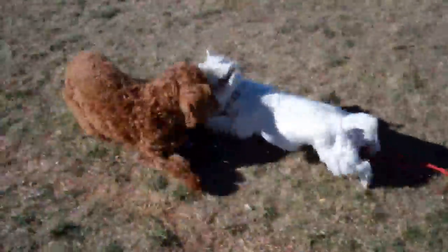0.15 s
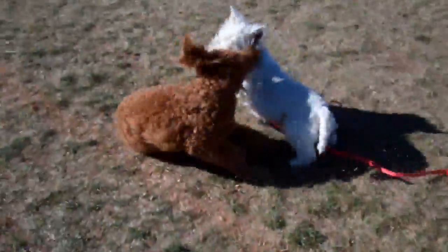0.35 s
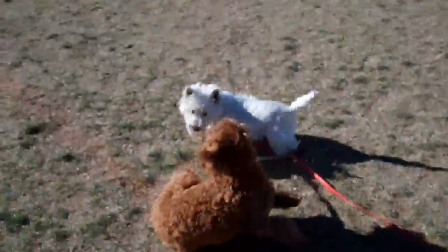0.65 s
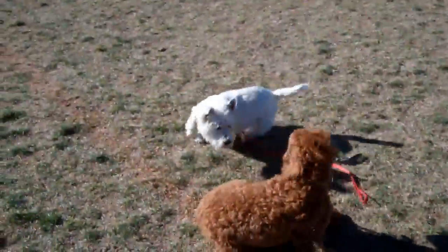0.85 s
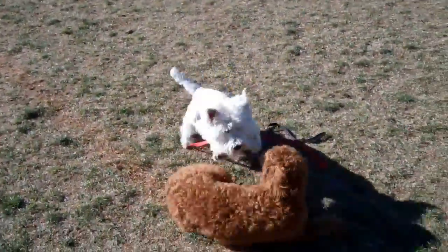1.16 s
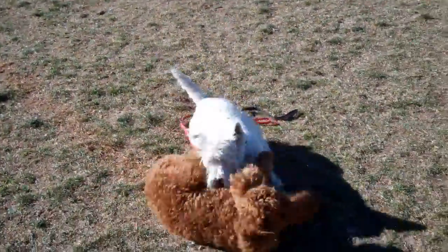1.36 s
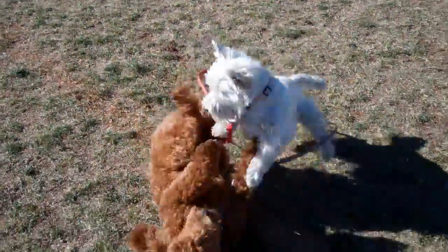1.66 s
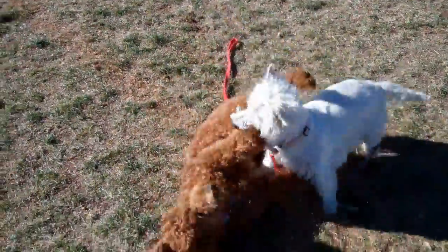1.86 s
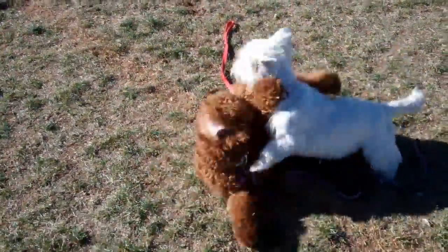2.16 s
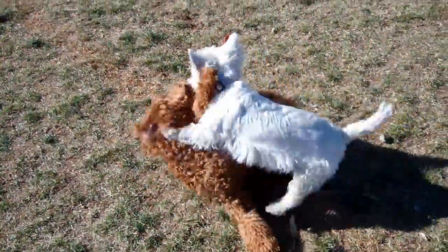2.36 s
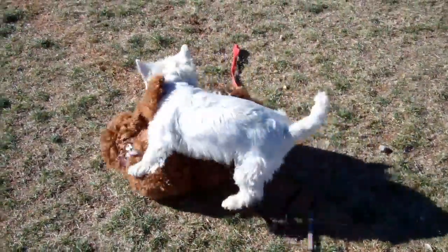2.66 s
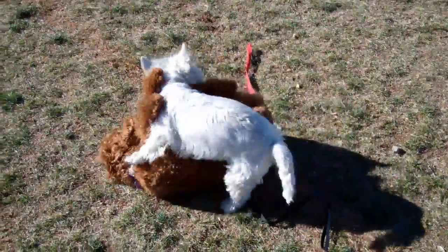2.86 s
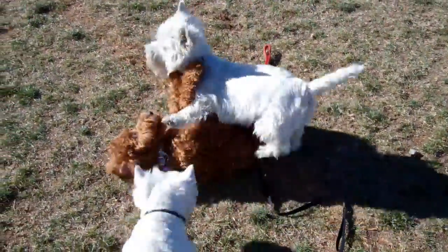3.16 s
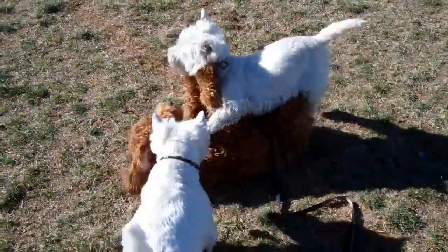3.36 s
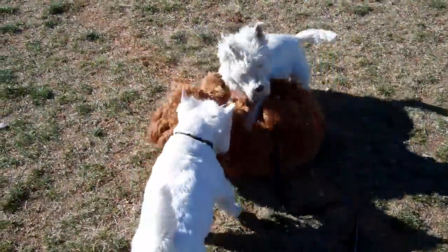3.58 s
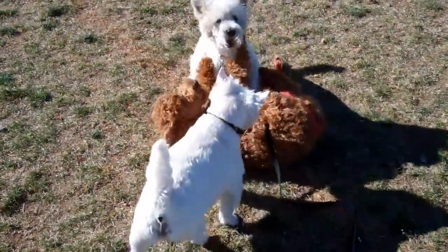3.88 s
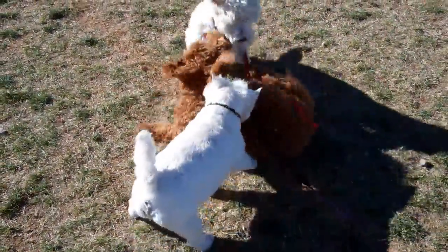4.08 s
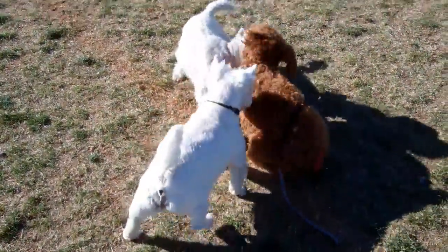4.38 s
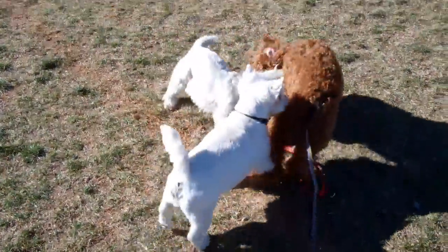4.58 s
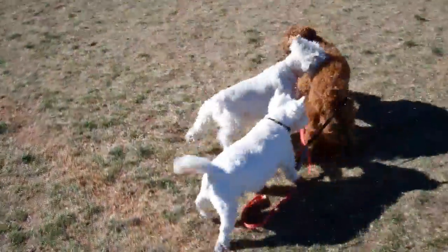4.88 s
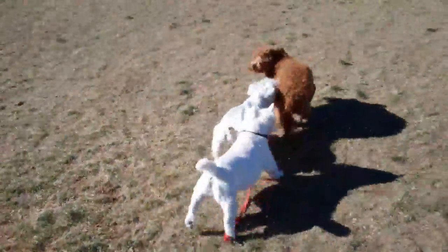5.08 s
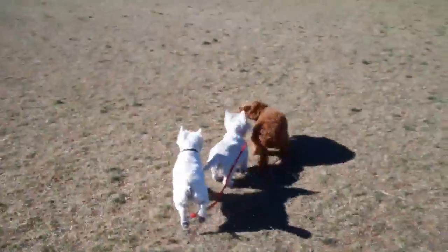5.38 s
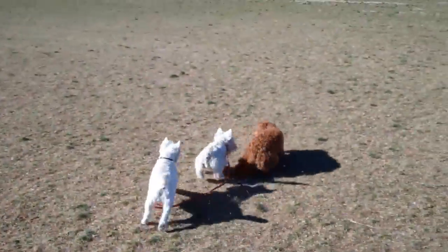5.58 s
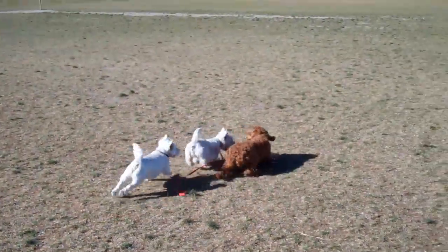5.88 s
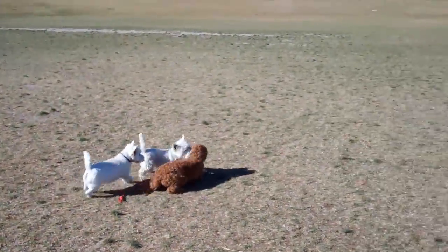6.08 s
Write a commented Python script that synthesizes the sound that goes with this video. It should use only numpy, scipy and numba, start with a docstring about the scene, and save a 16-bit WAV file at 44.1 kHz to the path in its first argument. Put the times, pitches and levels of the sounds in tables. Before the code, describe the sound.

Small dogs play-fight on dry grass in an open park. Wind buffets a stereo microphone, mostly on the right, as they snort and their tags tick and clink. A thin whine leads to a long rough growl, a louder one and a softer one, then short grunts. Grass crackles and collars jingle faintly throughout, with snorts returning to the end.

```python
"""Small dogs wrestle on dry grass in an open park, with wind on a two-port microphone.
First wind and a thump on the left, nose snorts (resonated air), modal tag clinks, ticks (ringing noise).
Then a whine, a long and a loud growl, a softer one and short grunts: fold pulses through moving resonances.
Large-tag clinks cross the growls; snorts return up to the end.
Throughout: crackling grass (random snaps), faint jingling, a gusty breeze mostly on the right, park hush."""
import sys
import numpy as np
from scipy import signal
from scipy.fft import rfft, irfft
from scipy.io import wavfile
from scipy.ndimage import uniform_filter1d
from numba import njit

SR = 44100
rng = np.random.default_rng(int(sys.argv[2]) if len(sys.argv) > 2 else 0)


def store_pcm(level_fs):
    """Save levels as 16-bit WAV."""
    pcm = np.round(np.clip(level_fs, -1, 1) * 32767).astype(np.int16)
    wavfile.write(sys.argv[1], SR, np.atleast_2d(pcm).T)


N = 275184
TIME = np.arange(N) / SR
CUTOFF_HZ = 15600


def from_db(db):
    """Decibels to gain."""
    return 10 ** (np.asarray(db) / 20)


def rms_one(x):
    """Scale to unit power."""
    return x / np.sqrt(np.mean(x ** 2) + 1e-20)


def in_time(rows):
    """Each column of a curve at every sample."""
    s, *columns = np.transpose(rows)
    return [np.interp(TIME, s, column) for column in columns]


def at_hz(points, hz):
    """Read a spectrum on a log-frequency axis."""
    f, value = np.transpose(points)
    return np.interp(np.log(hz), np.log(f), value)


def drift(rate_hz):
    """Smooth chance with spread 1, changing about rate_hz times a second."""
    step = 20  # computed at every 20th sample, then interpolated
    r = np.exp(-2 * np.pi * step * rate_hz / SR)
    noise = rng.standard_normal(N // step + 2002)
    slow = signal.lfilter([1], [1, -2 * r, r * r], noise)[2000:]  # drop the filter's onset
    return np.interp(np.arange(N) / step, np.arange(len(slow)), rms_one(slow))


def coloured(x, spectrum):
    """Causal (minimum-phase) filter with the given spectrum; white noise keeps its power."""
    size = 8192
    hz = np.arange(size // 2 + 1) * SR / size + 1
    gain = rms_one(from_db(at_hz(spectrum, hz)))
    fold = np.r_[1, np.full(size // 2 - 1, 2), np.zeros(size // 2)]
    cepstrum = irfft(np.log(gain)) * fold
    impulse = irfft(np.exp(rfft(cepstrum)))
    return signal.fftconvolve(np.atleast_2d(x), impulse[None], axes=1)[:, :N]


def butter(x, order, hz, kind="low"):
    """Butterworth filter."""
    return signal.sosfilt(signal.butter(order, hz, kind, fs=SR, output="sos"), x)


def resonance(x, hz, width_hz):
    """Two-pole band-pass with gain 1 on top."""
    r = np.exp(-np.pi * width_hz / SR)
    zeros = np.array([1, 0, -1]) * (1 - r * r) / 2
    return signal.lfilter(zeros, [1, -2 * r * np.cos(2 * np.pi * hz / SR), r * r], x)


@njit
def moving_resonance(x, angle, r):
    """The same band-pass with centre (radians a sample) and pole radius given at each sample."""
    y = np.zeros(len(x))
    for i in range(2, len(x)):
        drive = (1 - r[i] ** 2) / 2 * (x[i] - x[i - 2])
        y[i] = drive + 2 * r[i] * np.cos(angle[i]) * y[i - 1] - r[i] ** 2 * y[i - 2]
    return y


def panned(x, left_db):
    """Level difference between the two ports."""
    return x * from_db(np.array([[left_db], [-left_db]]) / 2)


def add(out, s, sound):
    """Mix a short stereo sound in at time s."""
    start = int(np.clip(s * SR, 0, N - 1))
    out[:, start:start + sound.shape[-1]] += sound[..., :N - start]


# tilt of the side noise: hz, likeness (1 = least side)
LIKENESS = [(3000, 1), (12000, 0.3)]


def stereo_noise(spectrum):
    """Noise nearly alike at both ports; a faint side part, weighted to the treble, sets them apart."""
    side_spectrum = []
    for hz, db in spectrum:
        unlike = np.clip(1 - at_hz(LIKENESS, hz), .01, 1) / 2
        side_spectrum.append((hz, db + 10 * np.log10(unlike)))
    mid = coloured(rng.standard_normal(N), spectrum)
    side = coloured(rng.standard_normal(N), side_spectrum)
    return rms_one(mid + from_db(-25) * side * [[1], [-1]])


def swelling(base, swells, rise_s, fall_s):
    """Level in dB of a slow base with swells on top; each rises, holds and falls."""
    power = from_db(in_time(base)[0]) ** 2
    for start_s, length_s, db in swells:
        outside = np.maximum((start_s - TIME) / rise_s, (TIME - start_s - length_s) / fall_s)
        power = power + (from_db(db) * np.exp(-np.clip(outside, 0, 10) ** 2)) ** 2
    return 10 * np.log10(power)


# upper resonances of the muzzle: centre_hz, width_hz, relative_db
MUZZLE = [(2167, 190, 1), (2600, 81, -0.5), (3700, 250, -8), (5300, 270, -15)]
THROAT_HZ, THROAT_WIDTH_HZ, MOUTH_WIDTH_HZ = 770, 170, 170
VOICE_FADE_S = 0.0081


def voice(curve, throat_db, bite_db=0, rasp=0.74, snarl_db=-3, snarl_ratio=1.312, throb_db=2.5, throb_hz=70):
    """Vocal folds swing evenly when clear and lurch when rough; their pulses ring throat and moving mouth."""
    start_s, end_s = curve[0][0], curve[-1][0]
    near = (TIME > start_s - .05) & (TIME < end_s + .05)
    t = TIME[near]
    level_db, pitch_hz, rough, mouth_hz, treble_db = [c[near] for c in in_time(curve)]
    rough = np.clip(rough, 0, 1)

    even_cycles = np.cumsum(pitch_hz * (1 + .024 * drift(110)[near])) / SR
    harmonics = range(1, int(SR / 2 / pitch_hz.max()))
    clear = rms_one(sum(np.cos(2 * np.pi * k * even_cycles) for k in harmonics))
    uneven_cycles = np.cumsum(pitch_hz * (1 + .16 * drift(130)[near])) / SR
    pulses = np.diff(np.floor(uneven_cycles), prepend=0)
    pulses = rms_one(pulses * from_db(5 * drift(170)[near]))
    air = rng.standard_normal(len(t)) * (1 + np.cos(2 * np.pi * uneven_cycles))
    lurching = rms_one(pulses + rasp * air)
    source = np.cos(np.pi / 2 * rough) * clear + np.sin(np.pi / 2 * rough) * lurching

    mouth_angle = 2 * np.pi * mouth_hz * (1 + .08 * rough * drift(35)[near]) / SR
    mouth_r = np.full(len(t), np.exp(-np.pi * MOUTH_WIDTH_HZ / SR))
    mouth = moving_resonance(source, mouth_angle, mouth_r)
    # a rough snarl bares the teeth and adds a resonance above the mouth's
    snarl = rough * moving_resonance(source, snarl_ratio * mouth_angle, mouth_r)
    throat = resonance(source, THROAT_HZ, THROAT_WIDTH_HZ)
    low = mouth - from_db(snarl_db) * snarl - from_db(throat_db) * throat
    low = butter(low, 2, [min(1.55 * pitch_hz.mean(), 600), 1900], "band")

    high = 0
    breathy = source + air * rough * rasp
    for (hz, width_hz, db), bared in zip(MUZZLE, [0, 0, 1, 1]):  # bite_db sets the upper two
        # lips and tongue tremble: each resonance wanders and flickers on its own
        angle = 2 * np.pi * hz * (1 + .055 * drift(22)[near]) / SR
        flicker = from_db(db + bared * bite_db + 3 * drift(35)[near])
        high = high + flicker * moving_resonance(breathy, angle, np.full(len(t), np.exp(-np.pi * width_hz / SR)))
    high = butter(high, 2, [1500, 7000], "band")

    # even out both bands over 16 ms, so that the curve sets the level
    low, high = [band / np.sqrt(uniform_filter1d(band * band, size=700) + 1e-12) for band in (low, high)]
    outside_s = np.maximum(np.maximum(start_s - t, t - end_s), 0)
    fade = np.exp(-(outside_s / VOICE_FADE_S) ** 2)
    throb = throb_db * rough * drift(throb_hz)[near]
    out = np.zeros(N)
    out[near] = (low + from_db(treble_db) * high) * fade * from_db(level_db + throb)
    return out


# thin wavering whine: time_s, level_db, pitch_hz
WHINE = [(1.585, -61, 599), (1.612, -50.5, 548), (1.641, -60, 600), (1.66, -58, 575), (1.685, -49, 618),
         (1.704, -45.5, 583), (1.745, -55, 552)]


def whine(rough=0.48, treble_db=-10):
    """A thin voice with the mouth tuned to its second harmonic."""
    curve = [(s, db, hz, rough, 2 * hz, treble_db) for s, db, hz in WHINE]
    return voice(curve, throat_db=-12)


# short grunts: peak_s, rise_s, level_db, pitch_hz, roughness (0-1), mouth_hz
GRUNTS = [(4.319, 0.012, -45.5, 410, 0.54, 1240), (4.729, 0.026, -47, 215, 0.8, 1180),
          (4.913, 0.035, -50, 258, 0.4, 980), (5.053, 0.062, -46, 262, 0.54, 1130)]


def grunts(edge_db=-11, release_share=0.65, glide_per_s=3.2, treble_db=-13):
    """Each grunt swells and dies a little faster, while pitch and mouth glide upward together."""
    out = 0
    for s, rise_s, db, hz, rough, mouth_hz in GRUNTS:
        curve = []
        for t, drop_db in [(-rise_s, edge_db), (0, 0), (release_share * rise_s, edge_db)]:
            glide = 1 + glide_per_s * t
            curve.append((s + t, db + drop_db, hz * glide, rough, mouth_hz * glide, treble_db))
        out = out + voice(curve, throat_db=-5.0)
    return out


# growls, all with columns time_s, level_db, pitch_hz, roughness (0-1), mouth_hz, treble_db
# a long growl that clears into short hoots
LONG_GROWL = [(2.493, -45.5, 356.2, 0.65, 1090, -14.5), (2.515, -32, 339.5, 0, 1070, -26),
              (2.536, -44, 334.3, 0.8, 1060, -4), (2.548, -34, 392, 0.54, 1140, -22),
              (2.59, -38.5, 408, 0.68, 1090, -10.5), (2.63, -37, 396, 0.82, 1110, -14),
              (2.672, -39, 371, 0.45, 1150, -13.5), (2.727, -47.5, 361, 0.9, 1120, -12),
              (2.755, -36.5, 360, 0.1, 1100, -19), (2.778, -49, 363.3, 0.8, 930, -5.5),
              (2.85, -40.5, 364, 0.72, 1080, -13), (2.877, -50, 380, 0.65, 1065, -1),
              (2.902, -36.5, 364, 0.3, 1090, -28), (2.918, -46, 372, 0.6, 1120, -19)]
# the loud growl, the mouth opening, closing and opening again
LOUD_GROWL = [(3.197, -46, 351.6, 1, 1340, -15), (3.213, -40, 352.7, 0.3, 1230, -8),
              (3.219, -29.5, 364.7, 0.34, 1170, -17), (3.256, -32, 413, 0.74, 1300, -19),
              (3.278, -34, 418.4, 0.7, 1300, -6.5), (3.305, -34.5, 410.4, 0.5, 1120, -12.5),
              (3.324, -40.5, 405, 0.95, 1010, -7), (3.344, -31, 418, 0.66, 920, -19),
              (3.369, -40, 430, 0.77, 870, -6), (3.384, -25.5, 427, 0.1, 890, -21),
              (3.404, -41.5, 414.6, 0.97, 1040, -4.5), (3.428, -32, 427, 0.3, 1160, -11.5),
              (3.455, -43, 387.4, 0.87, 1180, -2), (3.48, -38, 356.6, 0.08, 1150, -18.5),
              (3.502, -47.5, 325.7, 0.4, 980, -6)]
# a softer, clearer growl that swells late
SOFT_GROWL = [(3.725, -58.5, 331, 0.7, 1330, -9), (3.78, -49, 393.4, 0.2, 1190, -9.5),
              (3.825, -50, 333, 0.24, 1280, -12), (3.847, -60, 363, 0.8, 1110, -6),
              (3.872, -40.5, 368.6, 0.07, 1110, -8.5), (3.9, -47.5, 339.6, 0.5, 990, -12),
              (3.938, -37.5, 345.5, 0.28, 1210, -5), (3.968, -41.5, 385, 0.54, 1220, -23),
              (4.008, -52, 381.6, 0.35, 1160, -9)]


def growls():
    """All calls of the dogs, each with its own weight of throat and its own bite."""
    long = voice(LONG_GROWL, throat_db=1.0, bite_db=-5.0)
    loud = voice(LOUD_GROWL, throat_db=1.5, bite_db=-1.0)
    soft = voice(SOFT_GROWL, throat_db=-3.0, bite_db=-2.0)
    return whine() + long + loud + soft + grunts()


# snorts and huffs: peak_s, rise_s, fall_s, level_db, nose_hz
SNORTS = [(0.067, 0.022, 0.019, -47.5, 1620), (.468, 0.017, 0.0097, -47.5, 2250),
          (0.495, 0.012, 0.015, -46, 2340), (0.543, 0.025, 0.014, -40, 1720),
          (0.799, 0.02, 0.039, -49, 2630), (1.372, 0.011, 0.011, -49.5, 980),
          (1.426, 0.027, 0.017, -40.5, 1100), (1.507, 0.029, 0.053, -48, 1800),
          (1.885, 0.059, 0.031, -50.5, 2000), (2.005, 0.022, 0.022, -51.5, 3070),
          (2.925, 0.015, 0.0096, -48, 3000), (4.345, 0.033, 0.046, -52, 1460),
          (4.8, 0.023, 0.046, -53, 1840), (5.163, 0.038, 0.015, -42, 1740),
          (5.641, 0.051, 0.098, -56, 1900), (5.931, 0.036, 0.024, -39.5, 2070)]
# spectrum of their air: hz, relative_db (per Hz)
SNORT_AIR = [(300, 12.5), (750, 16), (1300, 10.5), (2300, 8), (3800, 7.5), (5500, 1.5), (10000, -7),
             (13000, -56)]


def snorts(nose_width_hz=560, nose_db=14.0, upper_db=6, upper_ratio=1.69, flutter_db=1.5):
    """Short blasts of air through two nose resonances, chopped by uneven flaps of the soft palate."""
    flaps = np.cumsum(140 * (1 + .35 * drift(60))) / SR  # about 140 a second
    chop = .22 + np.exp(-3.5 * (flaps % 1))
    air = stereo_noise(SNORT_AIR) * chop * from_db(flutter_db * drift(49))
    out = np.zeros((2, N))
    for s, rise_s, fall_s, db, hz in SNORTS:
        near = (TIME > s - 3 * rise_s) & (TIME < s + 3 * fall_s)
        t, flow = TIME[near] - s, air[:, near]
        nose = from_db(nose_db) * resonance(flow, hz, nose_width_hz)
        upper = from_db(upper_db) * resonance(flow, hz * upper_ratio, nose_width_hz)
        swell = np.exp(-(t / np.where(t < 0, rise_s, fall_s)) ** 2)
        out[:, near] += from_db(db) * rms_one(flow + nose + upper) * swell
    return out


# rustle of grass, fur and collars: time_s, relative_db
SCUFFLE = [(0.0, -58), (.534, -65.5), (.76, -73), (1.12, -66), (2.98, -64.5), (3.27, -59), (3.6, -65),
           (4.33, -63), (5.235, -52), (5.28, -69.5), (6.238, -70.5)]
# quick lunges through the grass: start_s, length_s, relative_db
LUNGES = [(1.403, 0.12, -59.5), (3.541, 0.12, -58.5), (5.794, 0.16, -60)]


def movement_db():
    """How hard the dogs stir the grass."""
    return swelling(SCUFFLE, LUNGES, rise_s=0.011, fall_s=0.013)


# faint jingling: its strength, half its range, and the power of the movement that its rate follows
JINGLE_DB, JINGLE_SPREAD_DB, JINGLE_FOLLOWS = -65, 5, 0.9


def blows(clinks, answer, count):
    """The clear clinks and some faint ones at random: s, then dB in each mode group, by the place struck."""
    chance = np.cumsum(from_db(JINGLE_FOLLOWS * movement_db()))
    faint = []
    for when, force, place in rng.random((count, 3)):
        s = np.interp(when, chance / chance[-1], TIME)
        faint.append((s, JINGLE_DB + JINGLE_SPREAD_DB * (2 * force - 1), place))
    face_db, rim_db = np.transpose(answer)
    return [(s, *(db + face_db + np.clip(place, 0, 1) * (rim_db - face_db)))
            for s, db, place in list(clinks) + faint]


def tag(clinks, modes, groups, detune, rattle_hz, left_db, spread_db, contact_s=0.00029):
    """A metal disc is struck and bounces once; rattling on its ring shifts and blurs its modes."""
    out, t = np.zeros((2, N)), TIME[:SR // 4]
    for s, *strengths_db in clinks:
        bounce_s = rng.uniform(.004, .02)
        for (hz, db, t60_s), group in zip(modes, groups):
            shift, lean, lag = rng.standard_normal(3)
            blur = np.cumsum(rng.standard_normal(len(t))) * np.sqrt(2 * np.pi * abs(rattle_hz) / SR)
            phase = 2 * np.pi * hz * (1 + detune * shift) * t + uniform_filter1d(blur, size=30)
            phase = phase + np.array([[1], [-1]]) * 0.42 * lag  # radians, opposite at the ports
            decay = from_db(strengths_db[group] + db - 60 * t / t60_s)
            envelope = decay * (1 - np.exp(-t / contact_s))
            ring = panned(np.sin(phase) * envelope, left_db + spread_db * lean)
            add(out, s, ring)
            add(out, s + bounce_s, ring * from_db(-14))
    return out


# clear clinks: time_s, strength_db (relative), place struck (0 face - 1 rim)
SMALL_CLINKS = [(0.3202, -49.5, 0.23), (0.586, -49, 0.44), (1.1338, -52.5, 0.72), (1.505, -42, 0.48),
                (2.0827, -50, .05), (4.142, -47, 0.64), (4.1828, -45, 0.5), (4.2039, -49.5, 0.58),
                (4.2273, -47.5, 0.6), (4.365, -56.5, 0.82), (4.6676, -58.5, 1), (5.0667, -52, 0.85),
                (5.2041, -50.5, 0.57), (5.241, -50, 0.68), (5.3996, -47, 0.45), (5.6282, -54.5, 0.4),
                (5.9497, -48, 0.65)]
# modes: mode_hz, relative_db, t60_s
SMALL_TAG = [(4080, -13, 0.088), (6500, 8, 0.061), (9355, 11.5, 0.094), (12130, 14.5, 0.045)]
# mode group of each mode: index into the answer
STRUCK_WITH = [0, 0, 1, 2]
# answer of the mode groups to a blow, lowest first: face_db, rim_db
SMALL_ANSWER = [(3.5, 0), (-34.5, 3), (-24.5, -15.5)]


def small_tag():
    """Small disc: clear clinks and 70 faint ones."""
    clinks = blows(SMALL_CLINKS, SMALL_ANSWER, count=70)
    return tag(clinks, SMALL_TAG, STRUCK_WITH, detune=0.0063, rattle_hz=25.1, left_db=5.0, spread_db=4.5)


# clear clinks: time_s, strength_db (relative), place struck (0 face - 1 rim)
LARGE_CLINKS = [(1.4914, -34.5, 0.058), (2.5604, -29, 0.44), (2.578, -25.5, 0.49), (2.6336, -35.5, 0.031),
                (2.8556, -41.5, 0.78), (3.0193, -43.5, 0.78), (3.058, -43, 0.93), (3.2134, -39.5, 0.83),
                (3.666, -46.5, 0.81)]
# modes: mode_hz, relative_db, t60_s
LARGE_TAG = [(4940, 8, 0.071), (5760, -1, 0.18), (5980, 6, 0.16), (7850, 13, 0.019), (8070, 5, 0.11),
             (9750, -5.5, 0.17), (11250, -8.5, 0.13)]
# borders between the mode groups: edge_hz
GROUP_EDGES_HZ = [5400, 7000, 9000]
# answer of the mode groups to a blow, highest first: face_db, rim_db
LARGE_ANSWER = [(-39, 6.5), (-3.5, -26), (-56, -1), (-14, -27)]


def large_tag():
    """Larger disc with its ring: clear clinks and 10 faint ones."""
    groups = [sum(hz < edge_hz for edge_hz in GROUP_EDGES_HZ) for hz, db, t60_s in LARGE_TAG]
    clinks = blows(LARGE_CLINKS, LARGE_ANSWER, count=10)
    return tag(clinks, LARGE_TAG, groups, detune=0.00057, rattle_hz=29.8, left_db=5.5, spread_db=2)


# dry ticks of clasps, paws and snapping stalks: time_s, strength_db (relative), ring_hz
TICKS = [(.2144, -46, 7600), (1.119, -31.5, 1250), (1.1967, -37, 6130), (1.745, -41, 6600),
         (1.9624, -40, 6250), (2.6389, -31.5, 7800), (3.6468, -37.5, 6330), (3.971, -43, 6200),
         (4.0457, -43, 5300), (4.2712, -40.5, 8300), (4.535, -34.5, 4960), (4.6324, -41.5, 9800),
         (4.9531, -37.5, 5000), (4.9947, -34.5, 6000), (5.0101, -39.5, 8500), (5.5398, -38.5, 9700),
         (5.6835, -39, 3900), (6.0503, -34.5, 11200)]
# tick spectrum: hz, relative_db (per Hz)
TICK_COLOUR = [(1000, -10.5), (4000, -4), (8200, 2.5), (10500, 1.5), (13000, -6), (15500, -15)]
CONTACT_DB, CONTACT_HZ = -44.5, 6940  # the tick that starts each clear clink of the small tag


def ticks(tail_db=-15, crack_t60_s=0.0044, tail_t60_s=.05, ring_db=8, width_hz=450):
    """Each contact is a sharp crack and a crumbling tail that ring at its pitch; low ones are duller."""
    out, t = np.zeros((2, N)), TIME[:SR // 8]
    contacts = [(s, CONTACT_DB, CONTACT_HZ) for s, db, place in SMALL_CLINKS]
    for s, strength_db, hz in list(TICKS) + contacts:
        noise = rng.standard_normal((3, len(t)))  # one shared by the ports, one for each
        shape = from_db(-60 * t / crack_t60_s) + from_db(tail_db - 60 * t / tail_t60_s)
        crack = from_db(strength_db) * shape * (noise[0] + 0.52 * noise[1:])
        crack = butter(crack, 2, min(2 * hz, CUTOFF_HZ))
        second_ring = resonance(crack, hz * rng.uniform(0.61, 1), width_hz) / 2
        rings = resonance(crack, hz, width_hz) + second_ring
        add(out, s, crack + from_db(ring_db) * rings)
    return panned(coloured(out, TICK_COLOUR), left_db=2.5)


# grass spectrum: hz, relative_db (per Hz)
GRASS = [(600, 5), (1000, 4.5), (1900, 1.5), (5000, -2.5), (7000, -0.5), (10000, -3), (12000, -14),
         (14500, -16)]


def grass(stalks_per_s=5000, clump_db=4.5, swish=0.35, width=0.83):
    """Dry stalks of three thicknesses crackle, each in its own clumps, over the swish of fur."""
    level_db = movement_db()
    crackle = 0
    for band_hz in ([600, 3500], [3500, 7500], [7500, 15000]):
        struck = rng.random(N) < stalks_per_s / SR
        strength = rng.standard_normal(N) + width * rng.standard_normal((2, N))
        snaps = struck * strength * from_db(clump_db * drift(34.5))
        crackle = crackle + butter(snaps, 2, band_hz, "band")
    return from_db(level_db) * (rms_one(coloured(crackle, GRASS)) + swish * stereo_noise(GRASS))


def stalks(level_db=-4, snaps_per_s=110, width_hz=330):
    """Single stiff stalks snap under the paws, each with brief rings at pitches drawn by chance."""
    strength = from_db(4 * np.minimum(rng.exponential(1, N), 3.5))
    snaps = (rng.random(N) < snaps_per_s / SR) * strength
    at = np.flatnonzero(snaps)
    rings = 0
    for hz in np.geomspace(3400, 9800, 14):
        struck = np.zeros(N)
        chosen = rng.random(len(at)) < .25
        struck[at] = snaps[at] * rng.standard_normal(len(at)) * chosen
        rings = rings + resonance(struck + 1e-18, hz, width_hz)
    return panned(rms_one(rings) * from_db(movement_db() + level_db), left_db=4)


# slowly rising and falling breeze: time_s, relative_db
BREEZE = [(0.0, -56.5), (.42, -43), (.6, -40.5), (1.1, -41.5), (1.267, -52.5), (1.36, -43.5), (1.75, -40),
          (2.19, -44.5), (2.55, -43), (3.0, -39.5), (3.62, -36), (3.72, -44), (4.6, -46), (5.3, -52.5),
          (6.238, -54)]
# gusts on top of it: start_s, length_s, relative_db
GUSTS = [(0.021, 0.032, -38), (0.158, 0.13, -39), (0.51, 0.022, -34), (0.938, 0.023, -35.5),
         (1.925, 0.21, -39), (2.278, 0.28, -36), (3.168, 0.09, -38), (3.423, 0.17, -38.5),
         (4.179, 0.15, -43), (4.563, 0.11, -36.5), (5.023, 0.16, -43.5), (5.845, 0.14, -45)]
# left port against right: time_s, left_minus_right_db (before brightening)
LEFT_SHARE = [(0, -2), (.14, 13), (.27, 2.5), (.45, -18), (1.05, -19), (1.3, -6), (2.3, -12.5),
              (3.25, -7.5), (3.55, -20), (4.45, -5), (4.63, -13), (4.9, -6.5), (6.24, -2)]
# wind spectrum: hz, relative_db (per Hz)
WIND = [(18, -11.5), (40, 1), (100, -1), (200, -4), (300, -9.5), (600, -24.5), (2000, -49), (4000, -74)]


def wind(lump_db=3.5, lump_hz=45, brighten=0.65):
    """Eddies hit each port on their own; stronger gusts carry smaller, higher-pitched eddies."""
    gust_db = swelling(BREEZE, GUSTS, rise_s=0.026, fall_s=0.033)
    left = from_db(in_time(LEFT_SHARE)[0])
    ports = np.array([left, np.ones(N)]) / np.hypot(left, 1) * from_db(gust_db)
    lumps = from_db(lump_db * np.array([drift(lump_hz), drift(lump_hz)]))
    eddies = coloured(rng.standard_normal((2, N)) * lumps, WIND)
    eddies = eddies / np.sqrt(uniform_filter1d(eddies ** 2, size=3000, axis=1))  # even over 68 ms
    large = signal.sosfiltfilt(signal.butter(2, 190, fs=SR, output="sos"), eddies)
    small = eddies - large
    return ports * (large + small * (ports / from_db(-39.5)) ** brighten)


# sudden dull thumps: time_s, strength_db (relative, louder port), left_minus_right_db
THUMPS = [(0.046, -21, 23), (0.947, -21.5, -38), (1.12, -31, -20), (2.08, -24, -15), (2.991, -33, -27),
          (3.608, -22, -30), (4.175, -34, -4.5), (5.923, -32.5, 0)]
# thump spectrum: hz, relative_db (per Hz)
THUMP_COLOUR = [(40, -2.5), (170, 2), (450, -7), (900, -21.5), (2000, -29), (5000, -77)]


def thumps(swell_s=0.0032):
    """Brief low pushes of air, unrelated at the two ports."""
    out, t = np.zeros((2, N)), TIME[:SR // 16] / swell_s
    for s, strength_db, left_db in THUMPS:
        push = rng.standard_normal((2, len(t))) * t * np.exp(1 - t)
        add(out, s, panned(push, left_db) * from_db(strength_db - abs(left_db) / 2))
    return coloured(out, THUMP_COLOUR)


# distant hush: hz, relative_db (per Hz)
PARK = [(100, 6), (800, 22.5), (1300, 17.5), (2000, 10.5), (6000, -1), (10000, -64)]


def park(level_db=-68):
    """The distant hush of the park: steady coloured noise."""
    return from_db(level_db) * stereo_noise(PARK)


def scene():
    """Dogs, tags and grass in the open air, with wind at the microphone."""
    collars = from_db(5.0) * small_tag() + from_db(1.0) * large_tag() + from_db(1.0) * ticks()
    dogs = growls() + snorts() + collars + from_db(3.5) * grass() + stalks()
    return dogs + from_db(8.5) * wind() + from_db(0.5) * thumps() + park()


def record(dry):
    """The camera cuts the deepest rumble, dulls the top octave and then cuts it."""
    sound = butter(dry, 2, 20, "high")
    sound = butter(sound, 8, 13000)
    return signal.sosfilt(signal.ellip(10, .1, 80, CUTOFF_HZ, fs=SR, output="sos"), sound)


dry = scene()
out = record(dry)
store_pcm(out)
```